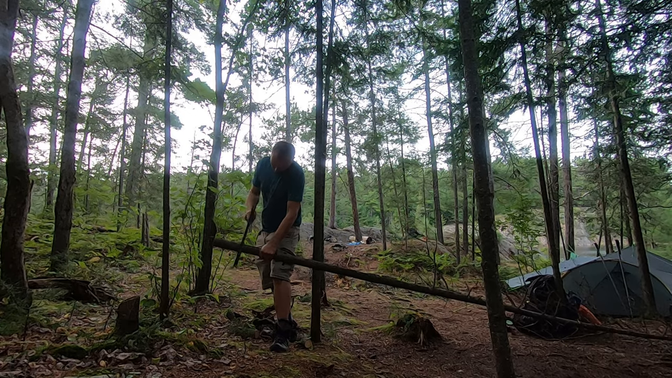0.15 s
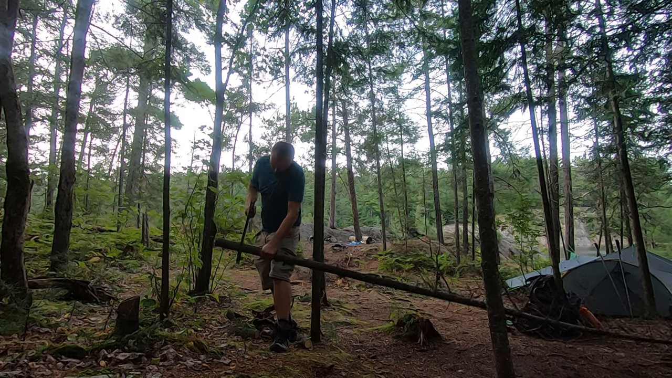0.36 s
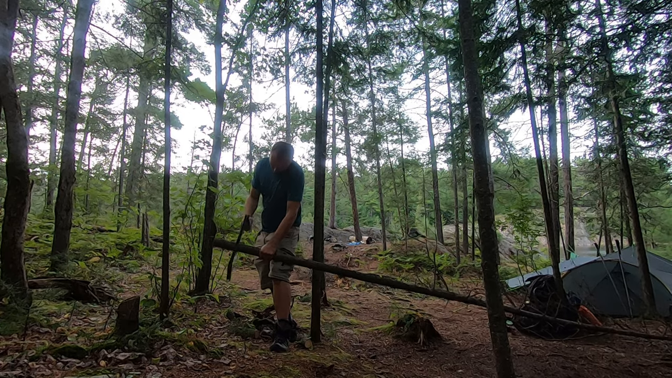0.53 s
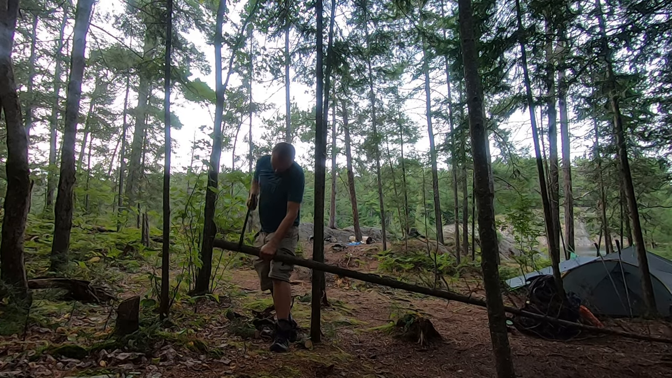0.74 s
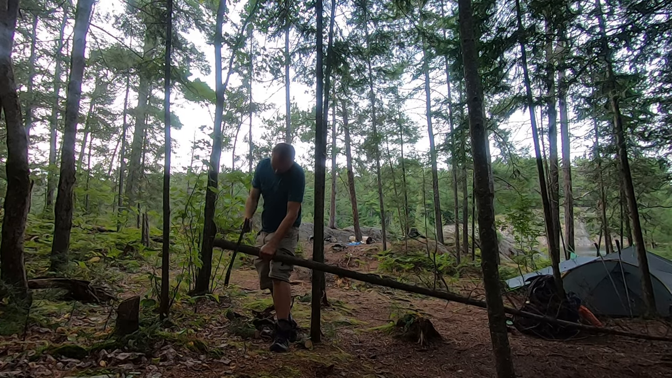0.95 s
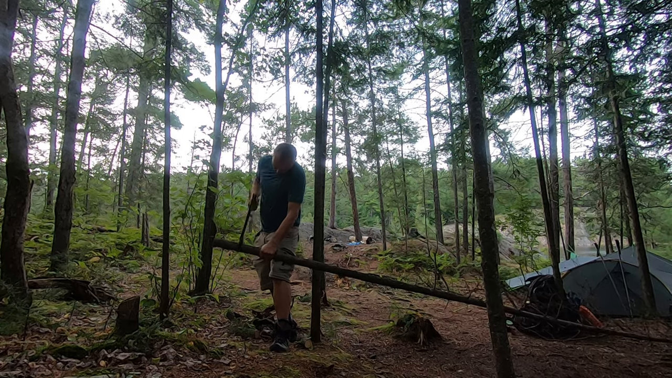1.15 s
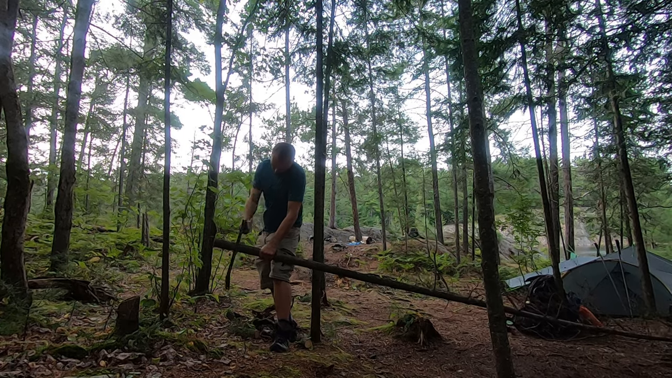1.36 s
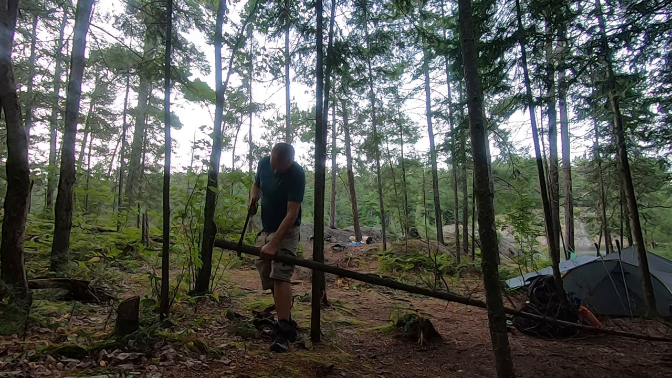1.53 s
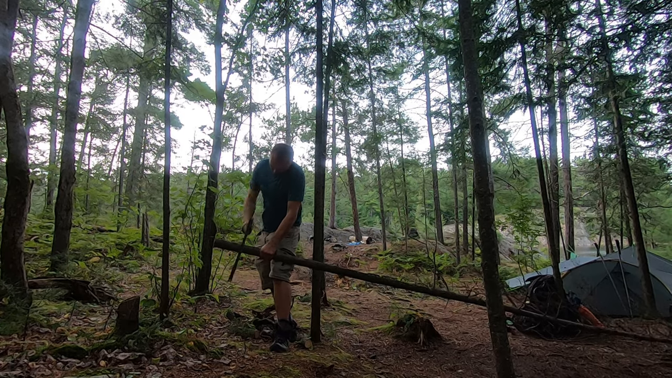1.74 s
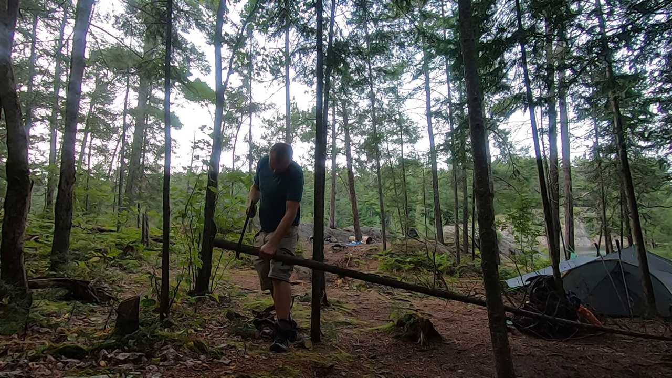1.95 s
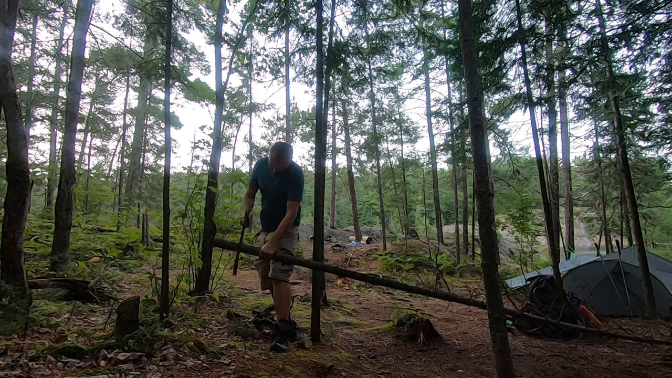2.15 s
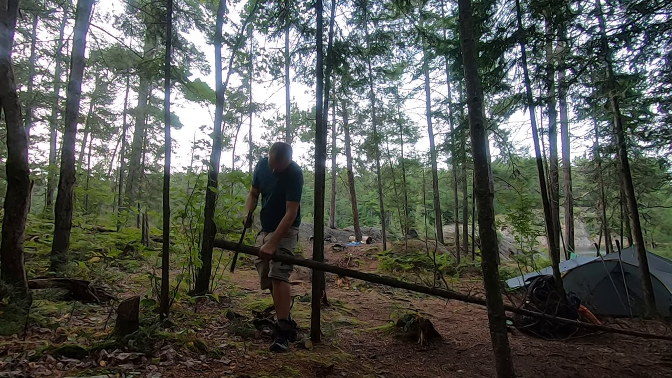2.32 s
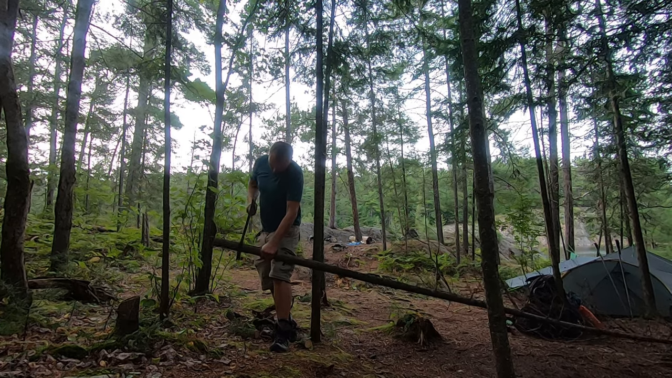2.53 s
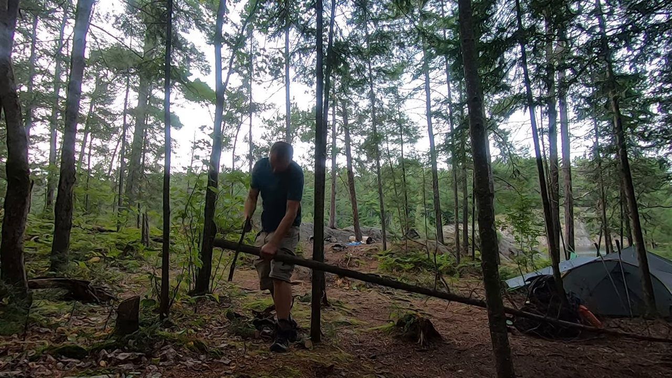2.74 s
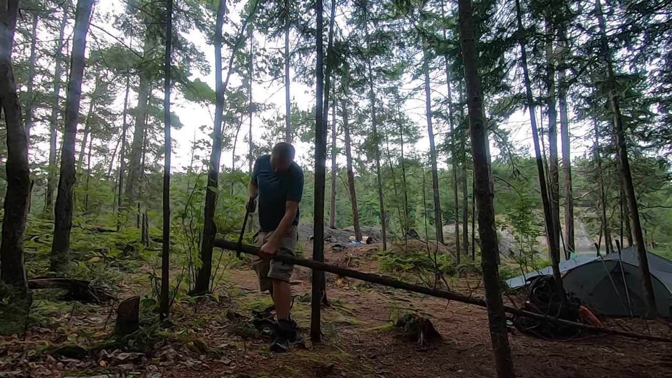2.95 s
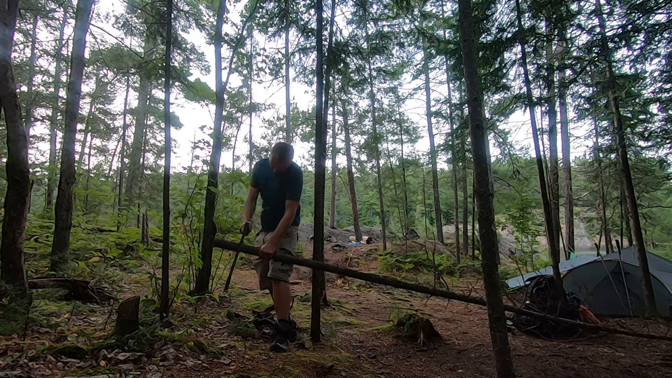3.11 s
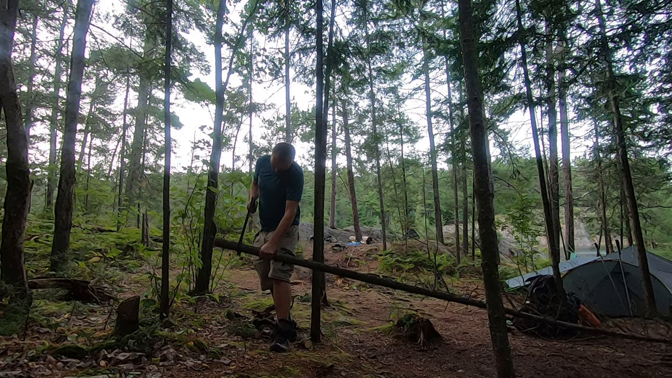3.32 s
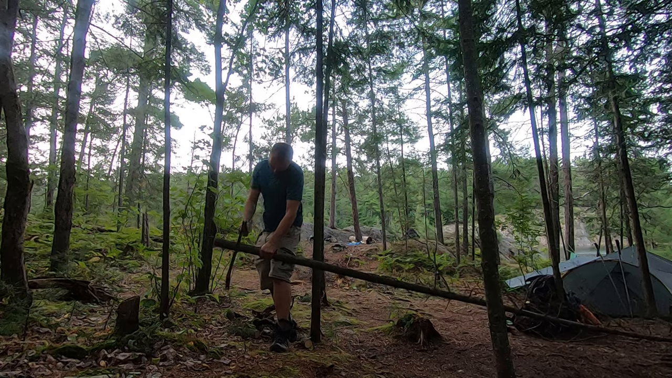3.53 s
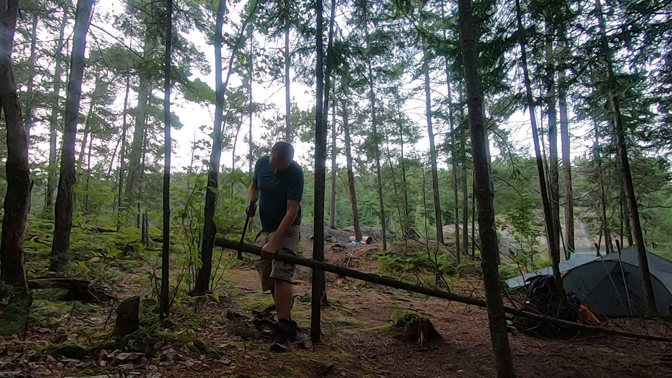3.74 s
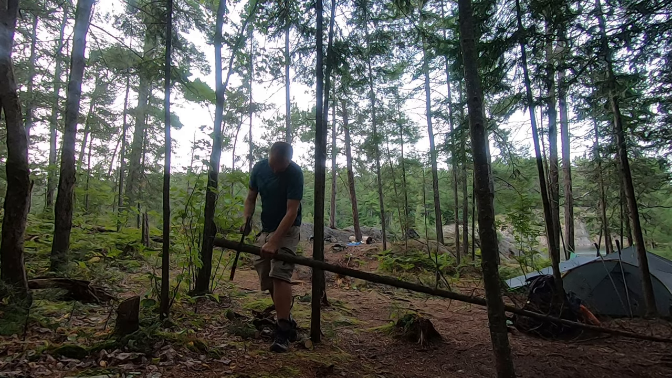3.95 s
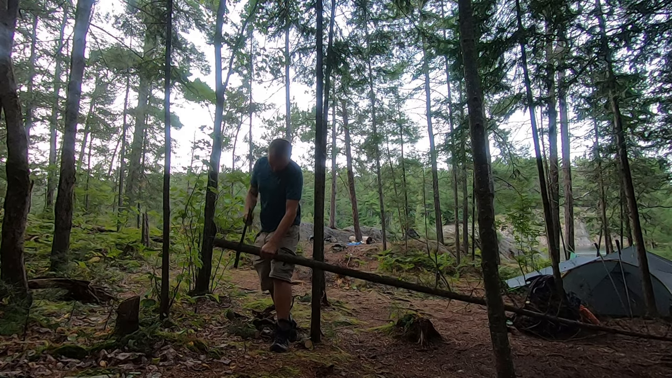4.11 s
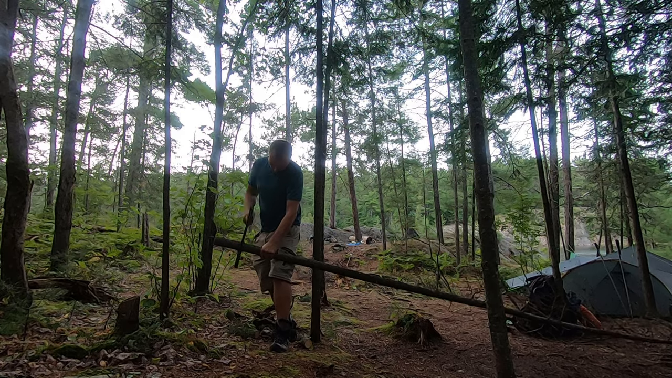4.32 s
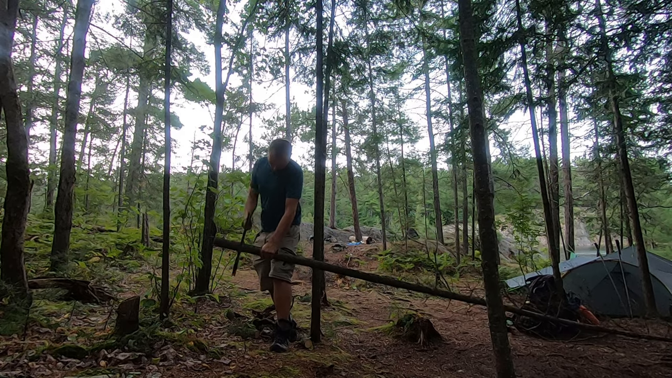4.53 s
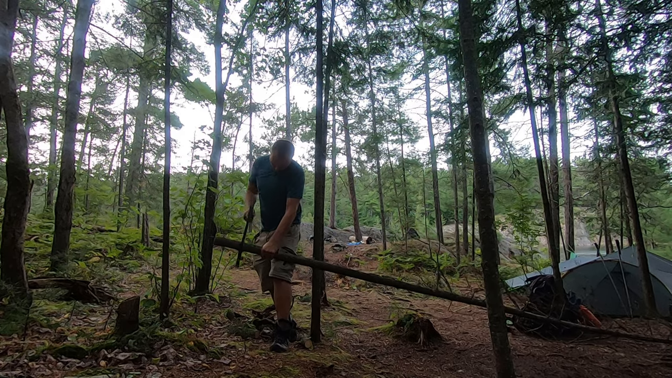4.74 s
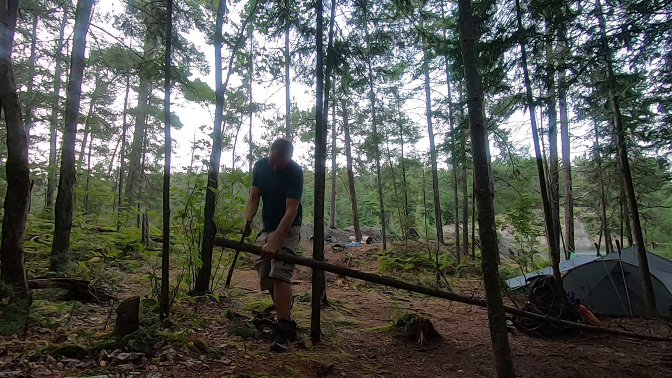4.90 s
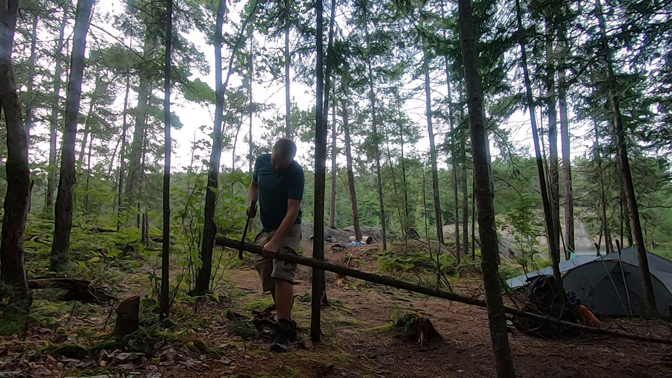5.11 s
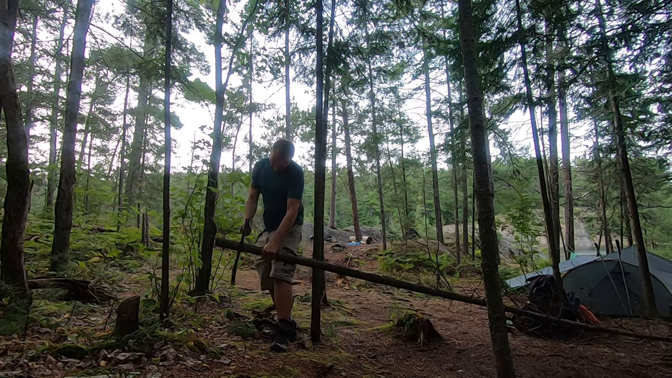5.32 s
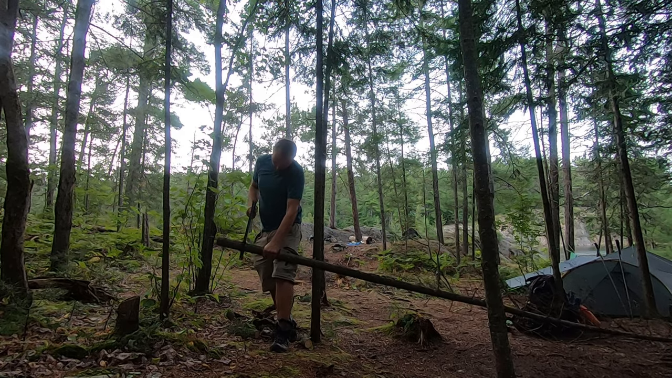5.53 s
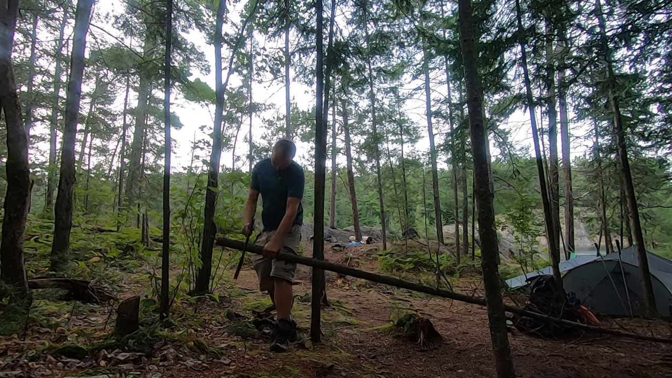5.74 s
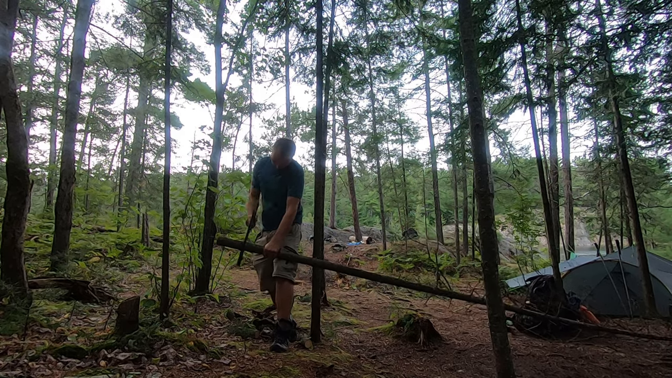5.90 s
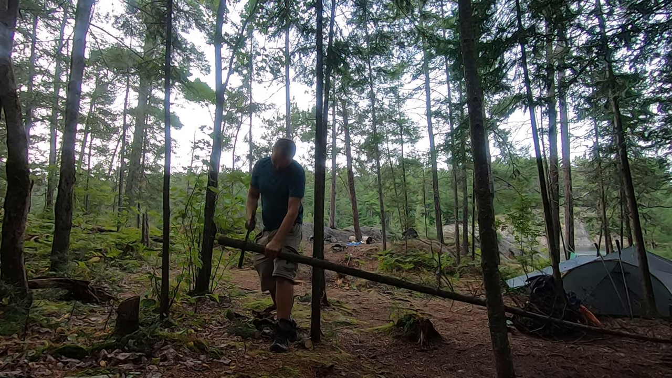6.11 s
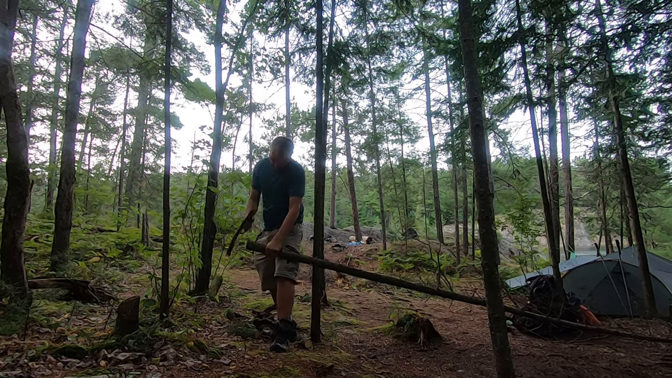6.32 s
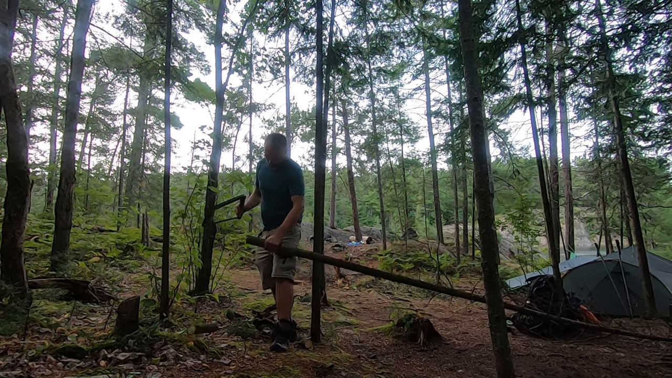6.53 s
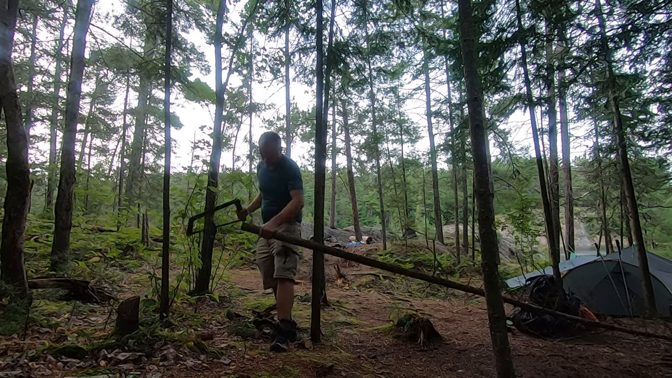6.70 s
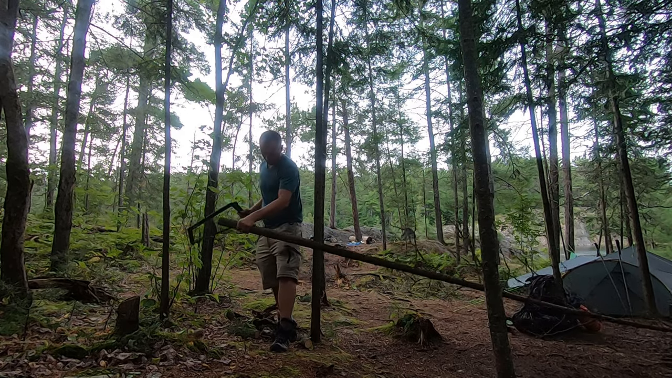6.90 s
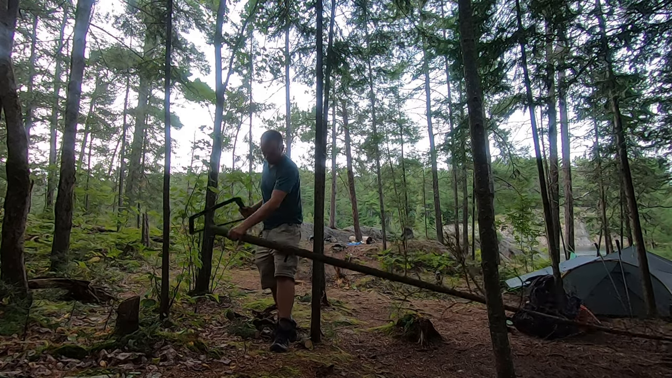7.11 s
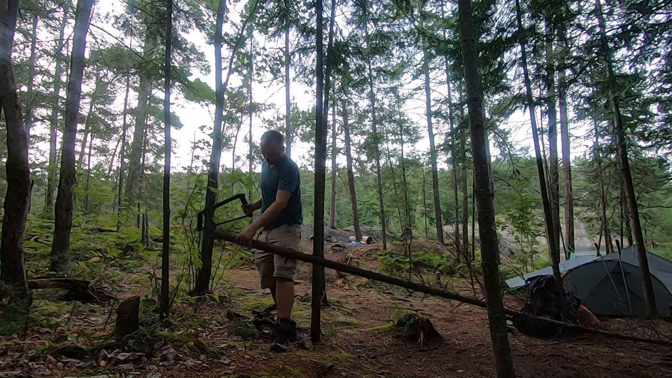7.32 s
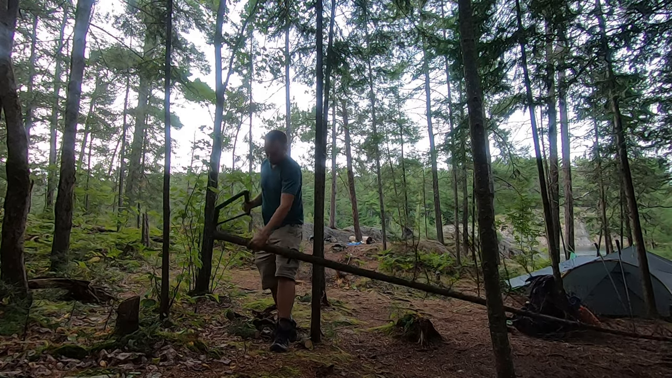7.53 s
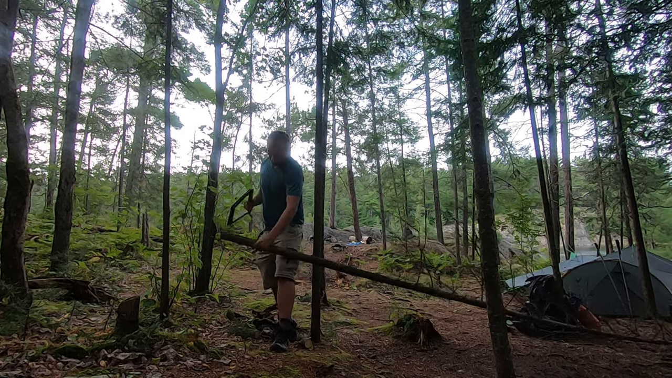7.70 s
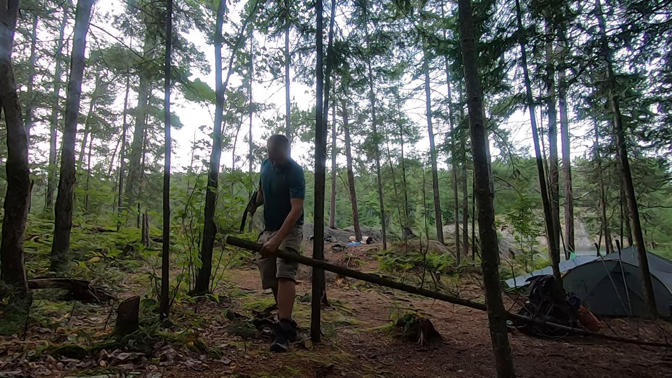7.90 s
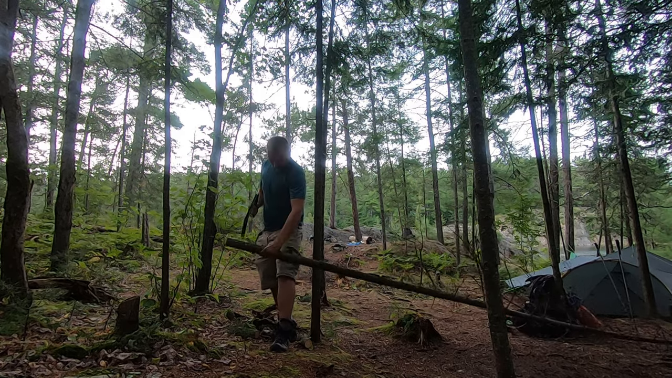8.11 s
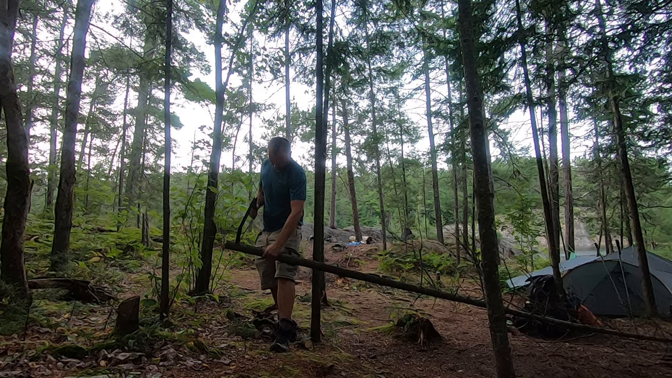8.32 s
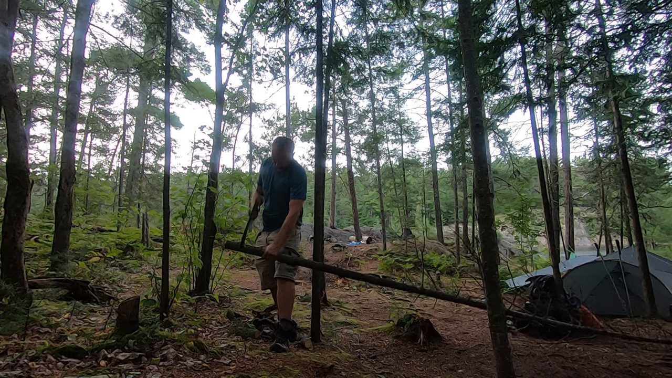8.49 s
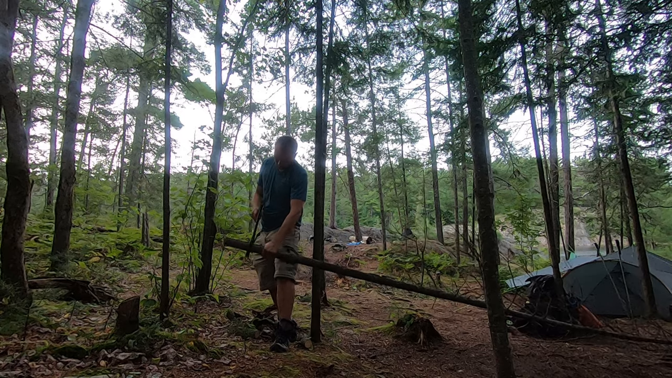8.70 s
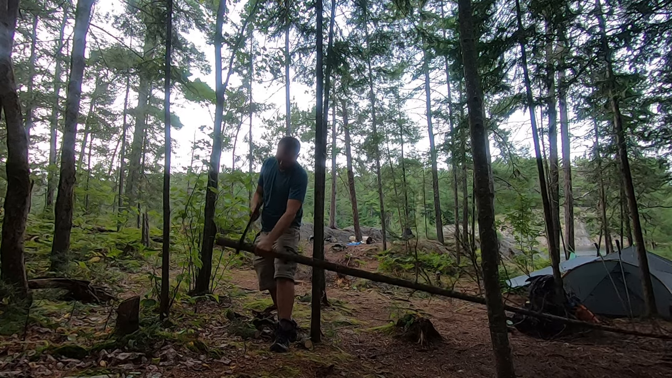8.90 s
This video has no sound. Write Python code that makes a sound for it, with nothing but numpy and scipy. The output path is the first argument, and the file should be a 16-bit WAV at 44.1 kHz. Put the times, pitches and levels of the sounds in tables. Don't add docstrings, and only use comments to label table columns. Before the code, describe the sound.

Brisk, regular hand sawing begins at once: a bright, scratchy steel ring over tearing wood, strong and weak strokes in turn, with small snags and knocks. It stops after six seconds. A low dull thud follows with small bounces, then shuffling in dry needles, wooden knocks, crisp ticks and very faint bird chips over soft forest air. Outdoor stereo pickup from some metres away, with short scatter from trunks.

```python
import sys
import numpy as np
from scipy import signal
from scipy.fft import rfft, irfft, next_fast_len
from scipy.io import wavfile
from scipy.ndimage import uniform_filter1d

SR = 44100
rng = np.random.default_rng(int(sys.argv[2]) if len(sys.argv) > 2 else 0)


def field_ratio(decibels):
    return 10 ** (np.asarray(decibels, dtype=float) / 20)


def unload_audio(sound):
    columns = np.transpose(np.atleast_2d(sound))
    steps = np.round(np.clip(columns, -1, 1) * 32767)
    wavfile.write(sys.argv[1], SR, steps.astype(np.int16))


N = 394694
SIZE = next_fast_len(N + SR)
HZ = np.arange(SIZE // 2 + 1) * SR / SIZE

# [turn before t/s, fastest t/s, level/dB, brightness level/dB]
STROKES = [(.004, 0.025, -33.5, -4), (0.189, 0.261, -38, -3), (.388, 0.497, -33.5, -4.5),
           (0.608, 0.711, -38.5, -5), (0.821, 0.927, -32.5, -3.5), (1.05, 1.152, -37, -1.5),
           (1.248, 1.368, -32.5, -2.5), (1.474, 1.588, -40, -2.5), (1.696, 1.806, -33.5, -4),
           (1.913, 2.006, -40.5, -4), (2.132, 2.234, -35.5, -3.5), (2.373, 2.451, -40.5, -3),
           (2.571, 2.693, -34, -2), (2.791, 2.909, -39.5, -3.5), (3.003, 3.137, -32.5, -2.5),
           (3.226, 3.352, -41.5, -2.5), (3.435, 3.568, -33.5, -3), (3.695, 3.775, -42, 0),
           (3.885, 4.012, -33.5, -0.5), (4.122, 4.207, -44, -1), (4.322, 4.469, -33.5, -1.5),
           (4.533, 4.695, -45, 2), (4.748, 4.904, -35.5, -1.5), (4.999, 5.125, -45, 1.7),
           (5.203, 5.346, -36.5, 0), (5.464, 5.568, -45, 0.8), (5.66, 5.813, -34.5, 1.2),
           (5.906, 6.033, -44.5, 2.5), (6.111, 6.23, -39, 1)]
# [t/s, level/dB]
SNAGS = [(0.413, -36), (0.4718, -18), (0.63, -42), (0.7502, -49), (0.896, -24), (0.9417, -20),
         (1.3385, -28), (1.55, -21), (1.7748, -30), (2.2152, -23), (2.613, -34), (2.8753, -23),
         (2.917, -31), (3.7735, -20), (3.82, -28), (3.8502, -28.5), (4.0195, -25), (4.215, -28),
         (4.284, -34), (4.4464, -18.5), (4.785, -33.5), (5.691, -61), (5.788, -36), (5.952, -48),
         (6.0236, -27), (6.1272, -36), (6.212, -21), (6.226, -25)]
# [t/s, level/dB, fade t/s]
BITES = [(0.0199, -36, 0.0095), (0.2404, -21, 0.0086), (0.2818, -24.5, 0.014), (0.4439, -33, 0.012),
         (0.5044, -21, 0.014), (0.6684, -25, 0.016), (0.704, -24, 0.012), (0.861, -33, 0.0093),
         (0.908, -20, 0.012), (0.9574, -21, 0.017), (1.1294, -30, 0.012), (1.285, -44, 0.0082),
         (1.3179, -33, 0.012), (1.3694, -21, 0.012), (1.5894, -28, 0.014), (1.7542, -26, 0.013),
         (1.799, -18, 0.012), (1.812, -22, 0.012), (1.979, -31, 0.014), (2.0194, -27, 0.012),
         (2.15, -32, 0.013), (2.175, -26, 0.014), (2.2383, -22, 0.012), (2.289, -21.5, 0.013),
         (2.414, -37, 0.0093), (2.4274, -25, 0.012), (2.6389, -34, 0.012), (2.6509, -26, 0.0094),
         (2.6794, -22, 0.013), (2.6994, -25, 0.012), (2.7194, -24, 0.011), (3.08, -27, 0.014),
         (3.1194, -22, 0.012), (3.1494, -23, 0.012), (3.309, -26, 0.011), (3.3696, -28, 0.013),
         (3.489, -40, 0.012), (3.5024, -39, 0.012), (3.5327, -32, 0.009), (3.5694, -27, 0.015),
         (3.7219, -35, 0.014), (3.933, -34, 0.012), (3.9549, -38, 0.0098), (4.1964, -40, 0.0094),
         (4.361, -33, 0.01), (4.3939, -34, 0.011), (4.405, -29, 0.014), (4.4794, -31, 0.012),
         (4.4994, -36, 0.011), (4.8239, -28, 0.01), (4.8794, -33, 0.012), (5.067, -33, 0.013),
         (5.0963, -28, 0.015), (5.1337, -32, 0.0099), (5.3343, -27, 0.012), (5.5594, -27.5, 0.013),
         (5.8294, -28, 0.0089), (6.145, -32, 0.0099), (6.1689, -27, 0.014), (6.2344, -33, 0.01)]
# [f/Hz, level/dB, t60 t/s, gain as the cut nears the handle level/dB]
BLADE = [(1363, -12.5, 0.03, -12), (1830, -46, 0.18, -35), (2050, -32, 0.6, 3), (2150, -17, 0.45, -26),
         (2246, 0, 0.3, -6), (2520, -10, 0.062, -11), (2534, -0.5, 0.073, -6), (2600, -16, 0.17, 6),
         (2703, 7.5, 0.02, -6.5), (2952, 0, 0.15, -5), (2950, -6.5, 0.16, 4)]
# [f/Hz, level/dB, t60 t/s, gain as the cut nears the handle level/dB]
UPPER_BLADE = [(3208, 7, 0.016, 7), (3230, -21, 0.05, 8), (3444, 4, 0.14, -3), (3614, -9.5, 0.068, 17),
               (3750, -4, 0.095, 7), (4218, -0.5, 0.06, 10.5), (4260, -33, 0.035, 11),
               (4727, -2.5, 0.015, 5), (5660, -15, 0.012, 13)]
# [f/Hz, level/dB]
FIBRES = [(1060, -64), (1800, -81), (2180, 0.5), (2350, -3), (2620, 0), (3330, -1.5), (3940, -2.5),
          (4290, -4), (7000, -20), (9100, -68), (15400, -120)]
# [f/Hz, level/dB]
WOOD = [(76, -74), (130, -15.5), (337, -4.5), (427, -2.5), (473, -18), (547, -9.5), (640, -5), (937, -4.5),
        (1360, 2), (1660, -5.5), (1900, 1), (2470, -1), (4180, -120)]
# [f/Hz, level/dB]
DUST = [(4500, -39), (6000, -30), (7200, -6.5), (8000, -4.5), (8900, 2.5), (9900, 3), (10700, -6.5),
        (11500, -15), (14000, -20), (15000, -27), (15700, -43)]
# [t/s, level/dB, f/Hz at full arm speed]
GROANS = [(0.041, -57.5, 399.7), (0.227, -63, 322.4), (.498, -51, 400), (.677, -55, 300.5),
          (0.915, -57, 371.6), (1.106, -63, 336), (1.356, -49, 401), (1.542, -62.5, 332),
          (1.797, -47.5, 401), (1.96, -59.5, 311.4), (2.23, -58.5, 379), (2.676, -39, 384.5),
          (2.863, -57, 327.7), (3.114, -41.5, 393.3), (3.298, -58, 294), (3.534, -55.5, 386.3),
          (3.986, -54, 366.5), (4.402, -54, 407), (4.662, -68, 344), (4.841, -56, 376), (5.312, -54, 392.7),
          (5.77, -54, 373.5), (6.04, -65, 300.4), (6.199, -51.5, 396)]
# [t/s, level/dB, f/Hz, t60 t/s]
SINGS = [(.33, -51, 2700, 0.36), (.79, -52, 2150, 0.3), (.99, -49.5, 2050, 0.43), (4.2, -46, 3430, 0.23),
         (5.6, -49, 3720, .15), (6.2, -50, 4200, .1), (6.21, -48, 3430, 0.1), (1.63, -56, 1830, 0.15),
         (5.57, -50, 2150, .15), (1.845, -42, 2050, 0.35), (3.85, -45, 2700, 0.35), (6.3, -54, 2150, 0.14),
         (6.33, -69, 2990, 0.12), (6.37, -59, 2150, 0.14), (6.35, -63, 3750, 0.24)]
# [t/s, level/dB, f/Hz, t60 t/s]
THUDS = [
    (6.539, -18.5, 129, 0.025),
    (6.5688, -32, 110, 0.024),
    (6.604, -47, 110, 0.079),
    (6.691, -36.5, 180, 0.034),
    (6.78, -41.5, 110.3, 0.028),
    (6.55, -42, 310, 0.059),
]
# [t/s, level/dB, f/Hz, t60 t/s, left minus right level/dB]
KNOCKS = [(7.193, -50, 700, 0.01, -2), (9.5, -44, 850, .012, 0), (7.779, -49, 600, .01, -1),
          (2.875, -38, 580, .03, 0), (4.018, -52, 530, .05, 0), (4.5, -46, 435, 0.05, 0),
          (4.6, -46, 324, 0.068, 0), (4, -33, 550, 0.055, 0), (5.2, -43, 410, .07, 0),
          (4.7, -46, 300, 0.033, 0), (2.7, -48, 560, 0.045, 0), (2.3, -42, 420, 0.077, 0),
          (3.14, -46, 580, .05, 0), (3.5, -38, 404, 0.071, 0), (7.722, -49, 890, 0.033, -3),
          (8.5, -51, 1400, 0.013, -2), (7.978, -57, 630, .012, -6), (.79, -43, 224, 0.057, 0),
          (5.585, -43, 266, 0.045, 1), (4.48, -39, 234, 0.064, 2), (2.866, -35, 310, 0.064, -2),
          (2.906, -35.5, 270, 0.04, -1), (6.536, -34, 500, 0.0094, -3), (6.537, -41, 850, 0.019, 0),
          (6.9, -63, 1300, .05, -5), (6.8, -51, 220, 0.018, 0), (7.826, -35, 793, 0.076, -13),
          (7.956, -33.5, 1700, 0.02, -11), (7.958, -50.5, 700, 0.041, -15)]
# [loudest t/s, level/dB, length t/s, treble above
# level/dB]
SHUFFLES = [(6.304, -64.5, 0.38, -23), (6.547, -62, 0.18, -13), (6.963, -61, 0.68, -4),
            (7.367, -68, 0.7, -18), (7.733, -62.5, 0.36, -7.5), (7.977, -66, 0.14, -4),
            (8.197, -70.5, 0.88, -11.5), (8.837, -66.5, 0.4, -12)]
# [f/Hz, level/dB]
LITTER = [(290, -35), (500, -17), (850, -4), (943, -17), (1170, -1.5), (1890, -9), (2280, -6), (4040, -8),
          (6000, -19.5), (7800, -46), (13200, -120)]
# [t/s, level/dB, thinness per band level/dB, middle band above level/dB, left minus right level/dB]
TICKS = [(6.537, -60, 0, 5, -2), (6.577, -64, -6, 4, 0), (6.59, -61, -3, 9.5, 0), (6.602, -53, -4, 4, 0),
         (7.148, -64, -5, 5, -9), (7.193, -42.5, 3.5, 6, -4.5), (7.206, -37.5, -1, 1.5, 2),
         (7.245, -55, -1, 2, -.5), (7.323, -61.5, -9, 9, 0), (7.415, -64, -1, 9, -3),
         (7.462, -67.5, -12, -2, -3), (7.684, -73, -7, 20, -5), (7.711, -62.5, -4, 15, -1),
         (7.727, -50.5, 1, -14, -7), (7.779, -52.5, -5.5, 11.5, -1), (7.8255, -57.5, -5, 6, -6),
         (7.715, -59, -5, 14, -1), (7.705, -64, -3, 8, -1), (7.754, -67, -3, 5, -1),
         (7.844, -63, -3, 3, -2), (7.963, -59, -5, 4, -6), (7.83, -46.5, 2.5, -10, -9),
         (7.869, -69, 4, 14, 2), (7.957, -49, -2, 2, -8), (8.172, -68, -9, 1, -4), (8.278, -67, -3, -2, -6),
         (8.802, -70, -4, 12, -.5), (8.852, -61, -6, 4, 0)]
# [from f/Hz, to f/Hz, fade t/s]
SNAP_BANDS = [
    (1140, 2040, 0.00095),
    (2570, 4400, 0.00061),
    (6050, 11400, 0.00037),
]
# [t/s, level/dB, f/Hz]
CHIPS = [
    (8.285, -66, 2350),
    (8.352, -76, 4950),
    (8.393, -72, 4950),
    (8.44, -73, 4950),
    (8.893, -68, 4250),
]
# [f/Hz, level/dB]
HUSH = [(15, -43), (30, -20), (45, -15), (112, -19), (172, -6), (278, -14.5), (354, -16.5), (573, -20),
        (637, -16.5), (833, -10.5), (1120, -18.5), (2780, -20.5), (4150, -28.5), (4620, -22.5), (6040, -38),
        (15000, -67)]
# [f/Hz, side minus mid level/dB]
HUSH_SIDE = [(60, -8.5), (110, 2.5), (200, -3), (380, -1), (700, 2.5), (1290, 5.5), (2380, -7), (4400, -9),
             (8120, 18), (15000, -9)]
# [f/Hz, level/dB]
TRUNKS = [(60, -19), (300, -8), (600, 2.5), (1300, 1.5), (2500, -11.5), (4000, -9), (6000, 3), (7400, 12),
          (9000, -1.5), (14000, 6.5)]
# [f/Hz, left leads by angle/rad]
PORT_LEAD = [(0, 0), (520, -.1), (1030, .8), (1290, -.3), (1720, -.1), (5680, .3), (6290, .8), (7240, 1.9),
             (8530, .3), (9730, .3), (10500, 1.2), (11600, 0)]
# [f/Hz, left minus right level/dB]
PORT_LEAN = [(60, -9), (110, 3), (200, -2), (380, -0.5), (700, -8), (1290, 1.5), (2380, 1), (4400, 0),
             (8120, -2), (15000, -11)]
# [f/Hz, level/dB]
LITTER_TREBLE = [(4000, -35), (5500, 3), (8000, -0.5), (11000, -6.5), (14000, -21), (15500, -43)]

CUT_THROUGH_S, OVERLAP_S = 6.248, .025
POINTED, POINTED_PER_DB = 2.875, .16
WOOD_DB, WOOD_DB_PER_S, WOOD_PULL_DB = -15.5, -0.86, 2.5
DUST_DB, DUST_SHARE, DUST_PULL_DB = -16, 0.48, 1.8
TEETH_HZ = 409.3
BITE_LOSS_DB, EVEN_SHARE = 19, .75
BLADE_DAMPED_S = .05
GRAB_S, DRAG_S, HARD_DB = .055, .09, -52
SAG, STALL = 2.5, .42
SHUDDER_DB = -6
SWELL, FADE_DB = 0.25, 10
HUSH_DB = -67
MIC_TOP_HZ = 15300


def level(x, db=0):
    return x * field_ratio(db) / np.sqrt(np.mean(x ** 2))


def along(points):
    hz, value = np.transpose(points)
    return np.interp(np.log(HZ + 1), np.log(hz + 1), value)


def shape(x, gain):
    return irfft(rfft(x, SIZE) * gain, SIZE)[..., :N]


def band(x, low_hz, high_hz):
    return signal.sosfilt(signal.butter(N=2, Wn=[low_hz, high_hz], btype="band", fs=SR, output="sos"), x)


def walk(rate):
    k = int(SR / rate)
    held = np.repeat(rng.standard_normal(N // k + 1), k)
    return 1.3 * uniform_filter1d(uniform_filter1d(held, k), k)[:N]


def grit(scatter_db, hold):
    k = max(int(hold * SR), 1)
    grain_db = scatter_db * np.repeat(rng.exponential(size=N // k + 1), k)[:N]
    return level(rng.standard_normal(N) * field_ratio(grain_db))


def add(out, s, sound):
    i = int(s * SR)
    out[..., i:i + sound.shape[-1]] += sound[..., :N - i]


def pan(db):
    return field_ratio(np.array([[db], [-db]]) / 2)


def ring(hz, t60, rise):
    t = np.arange(int(t60 * SR)) / SR
    return np.sin(2 * np.pi * hz * t) * field_ratio(-60 * t / t60) * np.minimum(t / rise, 1)


def strokes():
    t = np.arange(N) / SR
    speed, force, place, colour = np.zeros(N), np.zeros(N), np.zeros(N), np.zeros((3, N))
    ends = [row[0] for row in STROKES[1:]] + [CUT_THROUGH_S]
    for k, ((turn, fast, db, bright_db), end) in enumerate(zip(STROKES, ends)):
        pull = k % 2
        start, end = turn - OVERLAP_S, end + OVERLAP_S
        to_turn = np.minimum((t - start) / (fast - start), (end - t) / (end - fast))
        swing = np.sin(np.pi / 2 * np.clip(to_turn, 0, 1))
        press = field_ratio(db) * swing ** (POINTED + POINTED_PER_DB * (db + 38.5))
        wood_db = WOOD_DB + WOOD_DB_PER_S * fast + pull * WOOD_PULL_DB
        dust_db = DUST_DB + DUST_SHARE * bright_db + pull * DUST_PULL_DB
        on = press > force
        speed[on], force[on] = swing[on], press[on]
        colour[:, on] = np.array([[wood_db], [bright_db], [dust_db]])
        late = 2 * (t[on] - start) / (end - start) - 1
        place[on] = (-1) ** k * late
        colour[1:, on] -= np.array([[5.0], [3.0]]) * late
    return speed, force, place, colour


def dig(db, length, fade, rise):
    t = np.arange(length) / SR
    return field_ratio(db) * np.exp(-t / fade) * np.minimum(t / rise, 1)


def blade_modes(table, drive, place):
    out = 0
    for hz, db, t60, handle_db in table:
        r = field_ratio(-60 / (min(t60, BLADE_DAMPED_S) * SR))
        wander_db = 2.2 * walk(35) + 1.2 * walk(9)
        push = drive * field_ratio(db + handle_db * place + wander_db) * np.sqrt(1 - r)
        out = out + signal.lfilter([1, 0, -1], [1, -2 * r * np.cos(2 * np.pi * hz / SR), r * r], push)
    return out / np.sqrt(sum(field_ratio(2 * row[1]) for row in table))


def patchy(x, patch_db, lift_db):
    spectrum, out = rfft(x, SIZE), 0
    for hz in 125 * 2 ** np.arange(0, 7.1, 1 / 3):
        slot = np.clip(1 - 3 * abs(np.log2((HZ + 1) / hz)), 0, 1)
        share = np.clip(2 * np.log2(hz / 2900), -.5, .5) * (1800 < hz < 6500)
        out = out + irfft(spectrum * slot, SIZE)[:N] * field_ratio(patch_db * walk(18) + share * lift_db)
    return out


def saw(speed, force, place, colour):
    wood_db, upper_db, dust_db = colour
    force = force * field_ratio(0.36 * walk(50) + 0.95 * walk(120))
    phase = np.cumsum(TEETH_HZ * (.3 + speed) / 1.3 * (1 + .05 * walk(90))) / SR
    bite = field_ratio(1.25 * rng.standard_normal(int(N / 40)))[phase.astype(int)]
    tooth = bite * (1.5 + np.exp(-(phase % 1) / 0.35))
    grip = np.zeros(N)
    for s, db in SNAGS:
        add(grip, s, dig(db - 12.5, length=900, fade=0.0064, rise=0.0011))
    for s, db, fade in BITES:
        add(grip, s, dig(db - BITE_LOSS_DB, length=2600, fade=max(fade, .003), rise=0.0027))
    force = EVEN_SHARE * force + grip * np.minimum(2 * speed, 1)
    blade_tear, *sprays = (force * level(tooth * grit(0.76, 0.00065)) for _ in range(4))
    blade = field_ratio(-6) * blade_modes(BLADE, blade_tear * field_ratio(-.9 * upper_db), place)
    blade = blade + field_ratio(-4.5) * blade_modes(UPPER_BLADE, blade_tear * field_ratio(upper_db), place)
    blade = band(blade, 1100, 6500)
    slow_db = -6 * np.log2(np.maximum(speed, .15))
    levels = (-5, wood_db + 1.295 * slow_db, dust_db + 0.059 * slow_db)
    scrape = 0
    for points, db, spray in zip((FIBRES, WOOD, DUST), levels, sprays):
        gain = field_ratio(along(points))
        scrape = scrape + shape(spray * field_ratio(db), gain / np.sqrt(np.mean(gain ** 2)))
    return blade + patchy(scrape, patch_db=3.2, lift_db=upper_db + 2.5)


def groan(speed):
    out, rough = np.zeros(N), walk(150)
    shudder = level(band(grit(0.6, 0.004), 200, 520))
    for s, db, hz in GROANS:
        light = 1 / (1 + field_ratio(3 * (db - HARD_DB)))
        length = int(2 * (GRAB_S + (DRAG_S - GRAB_S) * light) * SR)
        u = np.linspace(-.4, 1.6, num=length)
        start = max(s - length / SR / 5, 0)
        now = slice(int(start * SR), int(start * SR) + length)
        loose = np.clip((-38.5 - db) * .012, .06, .22)
        stall = 1 - STALL * np.clip((db + 49) / 7, 0, 1) * np.clip(u, 0, 1.1)
        pitch = hz * stall * np.maximum(speed[now] ** SAG, .7) * (1 + loose * rough[now])
        turn = 2 * np.pi * np.cumsum(pitch) / SR
        wave = (1 - .4 * light) * np.sin(turn)
        wave += (0.17 + .4 * np.clip(u, 0, 1)) * np.sin(2 * turn)
        wave += (0.3 + light) * field_ratio(SHUDDER_DB) * shudder[now]
        arc_db = np.where(u < .3, 40, 24) * (u - .3) ** 2
        tone = wave * speed[now] * field_ratio(db + (1.5 + light) * rough[now][::-1] - arc_db)
        add(out, start, tone * signal.windows.tukey(length, .3))
    return signal.sosfilt(signal.butter(N=4, Wn=120, btype="high", fs=SR, output="sos"), out)


def blade_sings():
    out = np.zeros(N)
    for s, db, hz, t60 in SINGS:
        add(out, s, field_ratio(db) * ring(hz, t60, rise=0.006))
    return out


def offcut():
    out = np.zeros(N)
    for s, db, hz, t60 in THUDS:
        add(out, s, field_ratio(db) * ring(hz, t60, rise=.2 * t60))
    return out


def knocks():
    out = np.zeros((2, N))
    for s, db, hz, t60, pan_db in KNOCKS:
        add(out, s, field_ratio(db) * pan(pan_db) * ring(hz, t60, rise=0.087 * t60))
    return out


def litter():
    t = np.arange(N) / SR
    s, db, length, treble_db = np.array(SHUFFLES).T[:, :, None]
    away = np.maximum((s - t) / SWELL, (t - s) / (1 - SWELL)) / length
    swell = field_ratio(db - 3.5 - FADE_DB * away ** 1.56)
    out = 0
    for size, points in ((swell, LITTER), (swell * field_ratio(treble_db), LITTER_TREBLE)):
        mid, side = (level(shape(grit(1.2, 0.0024), field_ratio(along(points)))) for _ in range(2))
        crush = np.sqrt(np.sum(size ** 2, axis=0)) * field_ratio(2.3 * walk(30))
        out = out + crush * (mid + 0.62 * side * np.array([[1], [-1]]))
    return out


def twigs():
    out, t = np.zeros((2, N)), np.arange(1500) / SR
    for s, db, thin_db, crack_db, pan_db in TICKS:
        for (from_hz, to_hz, fade), rel_db in zip(SNAP_BANDS, (-thin_db, crack_db, thin_db)):
            burst = rng.standard_normal(1500) * (np.exp(-t / fade) + 0.15 * np.exp(-t / 0.0068))
            b, a = signal.butter(N=3, Wn=[from_hz, to_hz], btype="band", fs=SR)
            crack = signal.lfilter(b, a, burst)
            add(out, s, field_ratio(db + rel_db + 2.5) * pan(pan_db) * crack / abs(crack).max())
    return out


def bird():
    out, t = np.zeros(N), np.arange(900) / SR
    for s, db, hz in CHIPS:
        add(out, s - t[450], field_ratio(db) * np.hanning(900) * np.sin(2 * np.pi * hz * t))
    return out


def hush():
    colour = field_ratio(along(HUSH))
    mid = shape(rng.standard_normal(N), colour)
    side = shape(rng.standard_normal(N), colour * field_ratio(along(HUSH_SIDE)))
    return np.array([mid + side, mid - side]) * field_ratio(HUSH_DB - 4 + 0.5 * walk(1.98)) / np.std(mid)


def trunks(direct):
    t = np.arange(SR // 2) / SR
    decay = (field_ratio(-60 * t / 0.029) + field_ratio(-10.0 - 60 * t / 0.41)) * (t > .002)
    echo = rng.standard_normal((2, len(t))) * decay
    scatter = rfft(echo / np.sqrt(np.sum(echo ** 2)), SIZE) * field_ratio(along(TRUNKS) - 2.5)
    return shape(direct.mean(axis=0), scatter)


def scene():
    speed, force, place, colour = strokes()
    near = saw(speed, force, place, colour) + groan(speed)
    left = field_ratio(along(PORT_LEAN) / 2) * np.exp(.5j * along(PORT_LEAD))
    direct = shape(near, np.array([left, 1 / left]))
    work = direct + trunks(direct) + blade_sings() + offcut() + knocks()
    return work + litter() + twigs() + bird() + hush()


def band_limit(x):
    return signal.sosfilt(signal.butter(12, 15630, fs=SR, output="sos"), x)


def record(dry):
    top_cut = signal.butter(N=8, Wn=MIC_TOP_HZ, fs=SR, output="sos")
    mix = signal.sosfilt(top_cut, dry)
    return band_limit(mix)


dry = scene()
out = record(dry)
unload_audio(out)
```